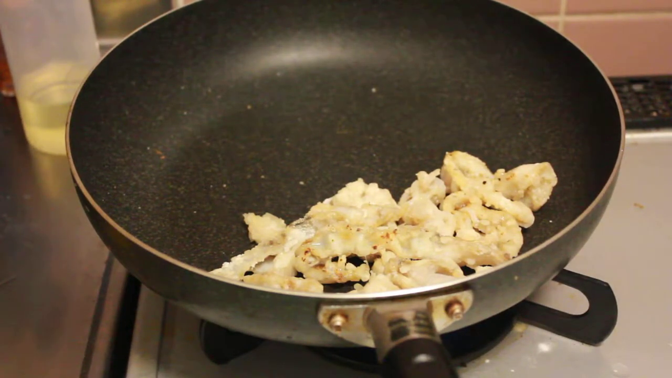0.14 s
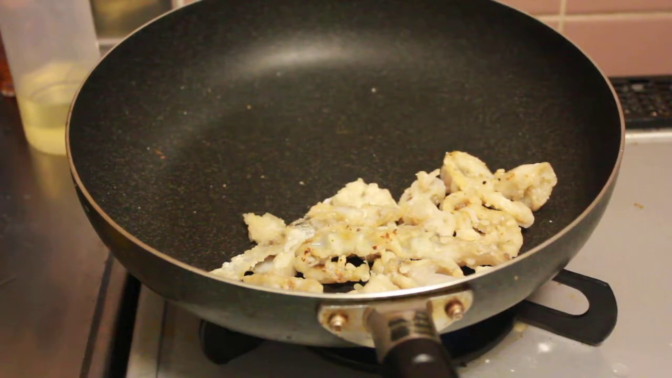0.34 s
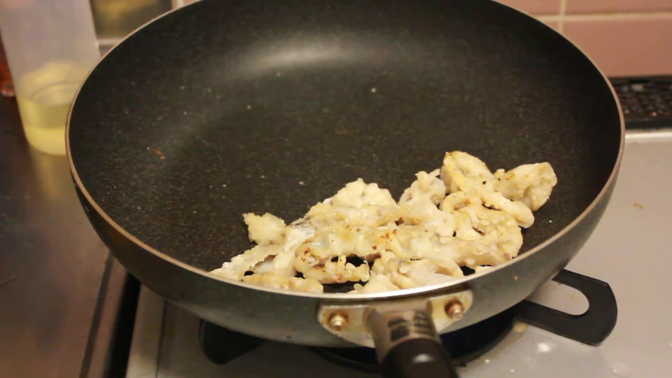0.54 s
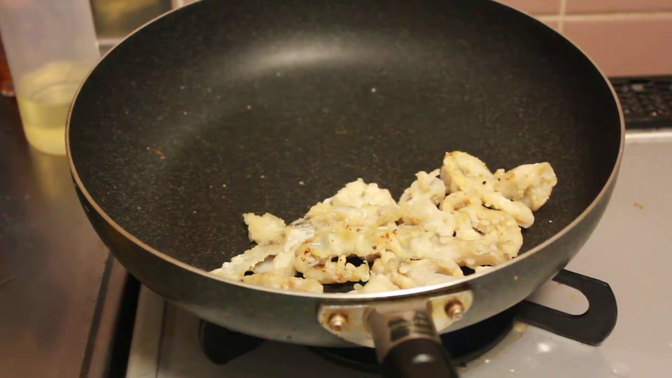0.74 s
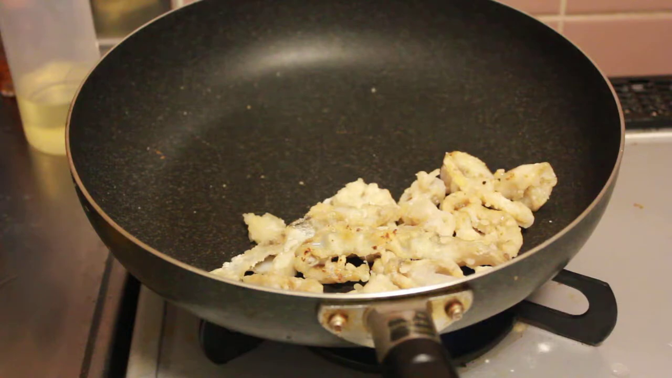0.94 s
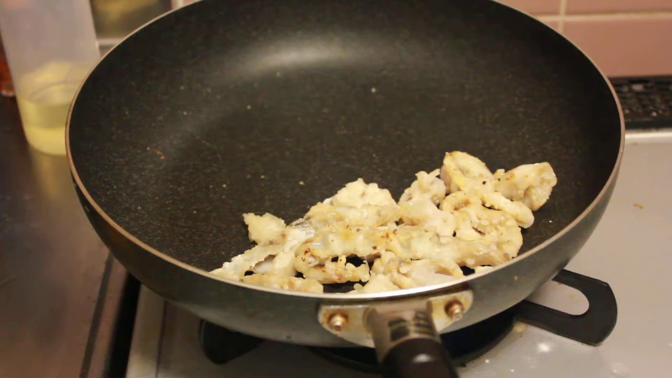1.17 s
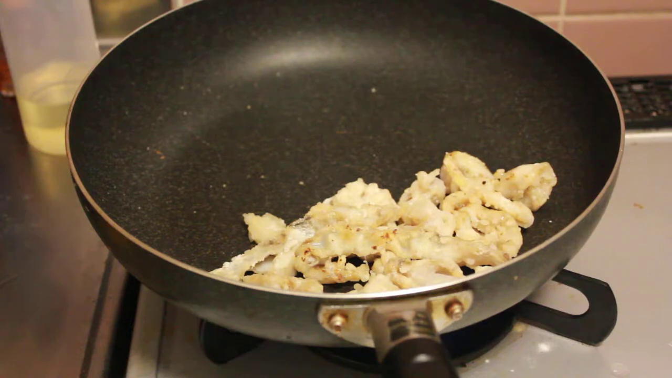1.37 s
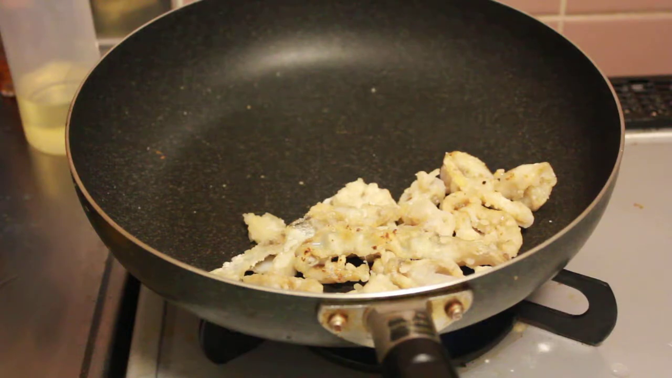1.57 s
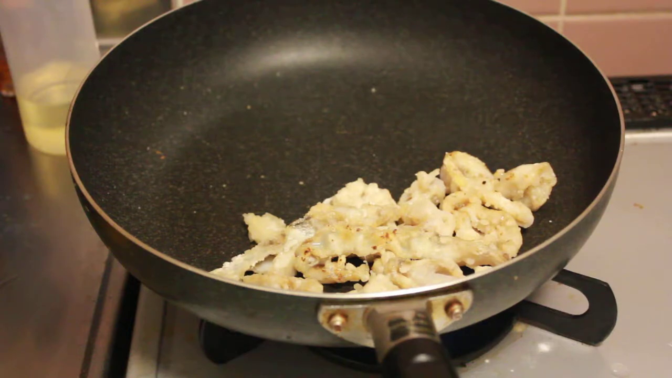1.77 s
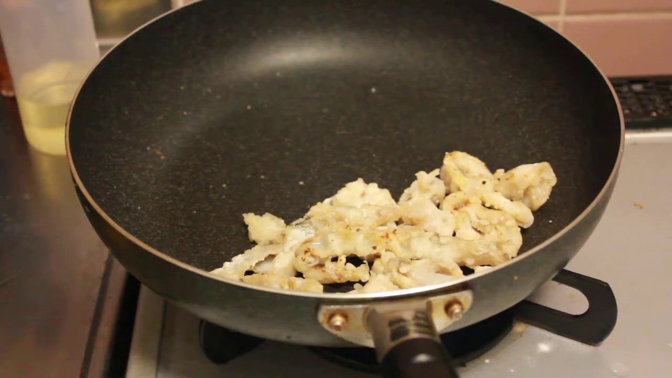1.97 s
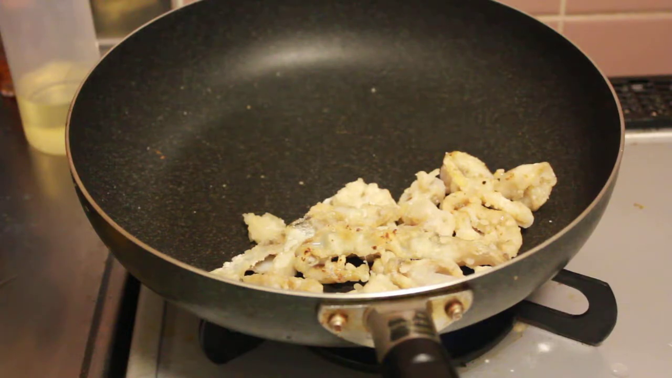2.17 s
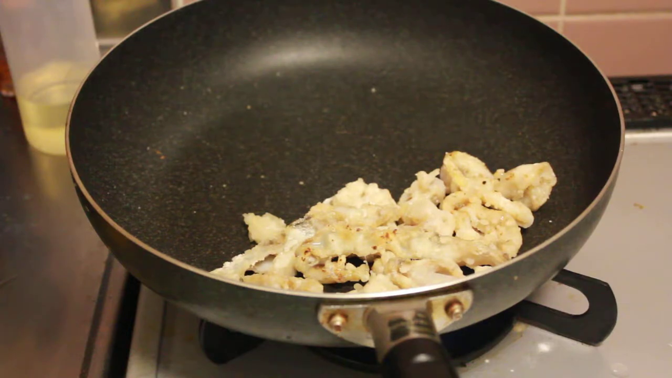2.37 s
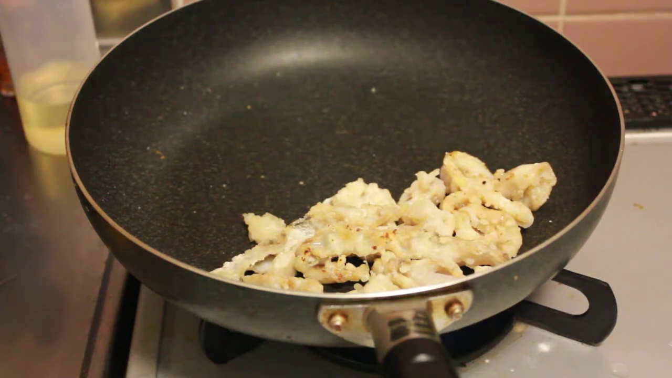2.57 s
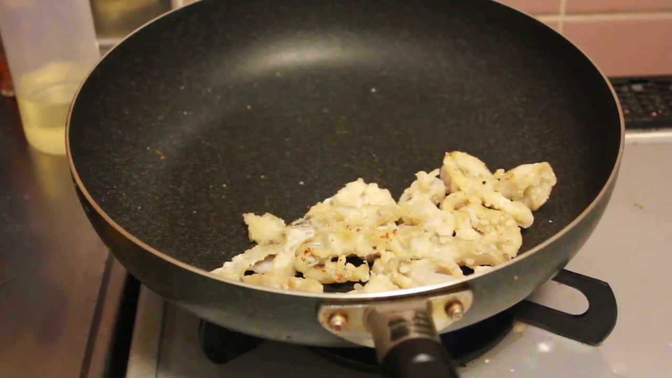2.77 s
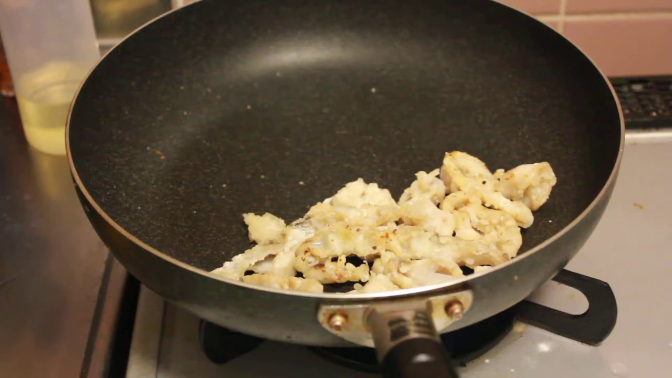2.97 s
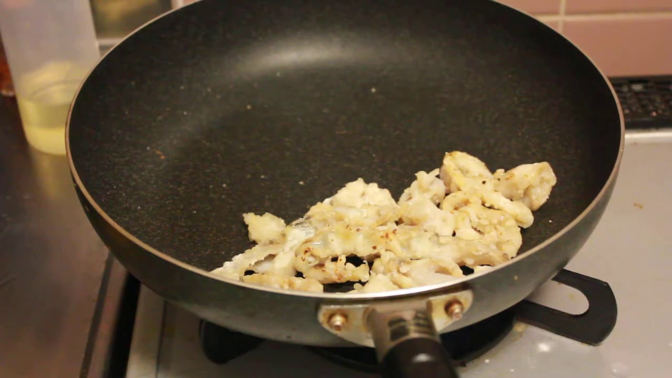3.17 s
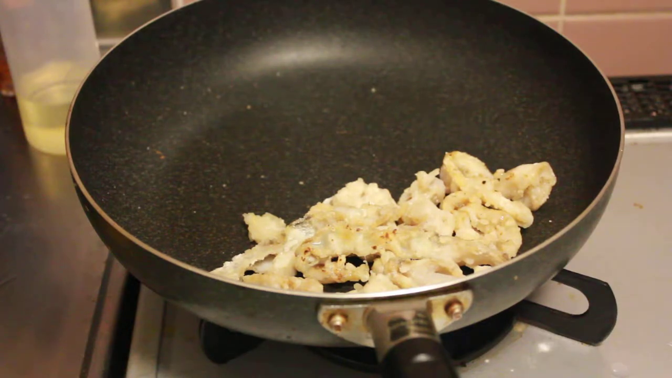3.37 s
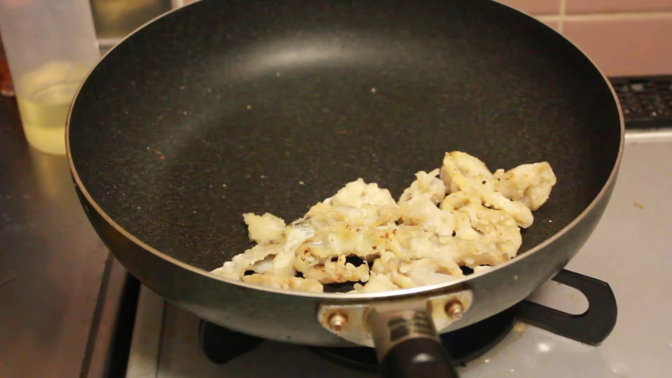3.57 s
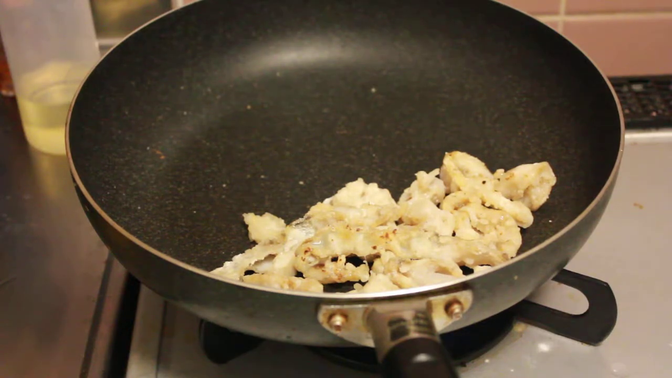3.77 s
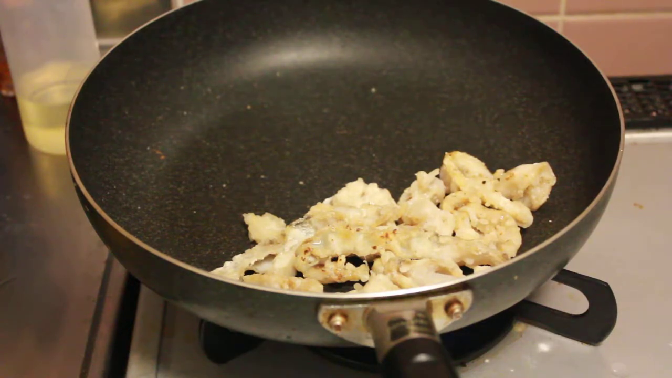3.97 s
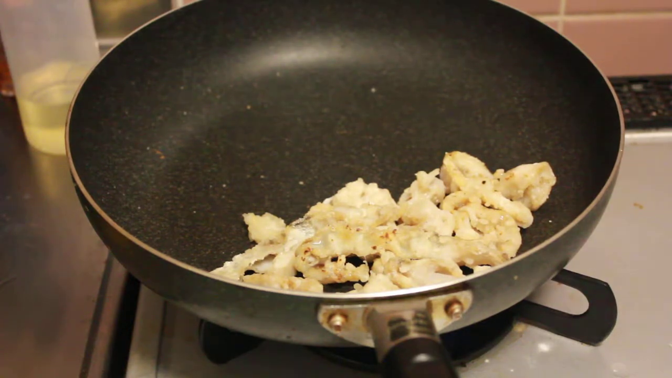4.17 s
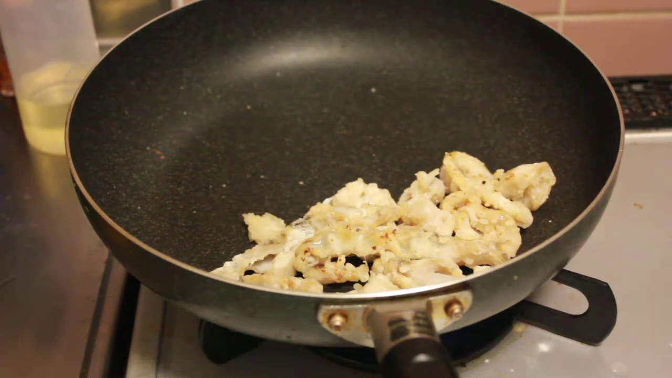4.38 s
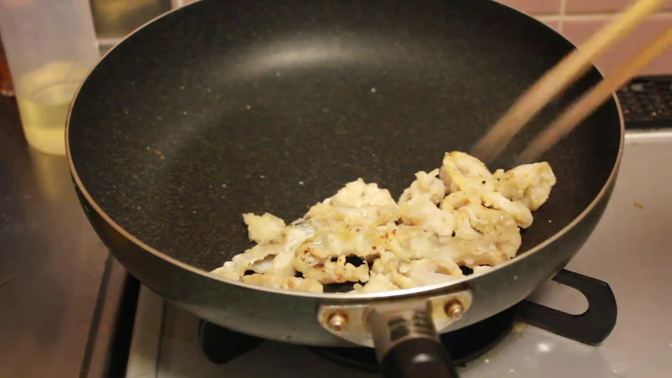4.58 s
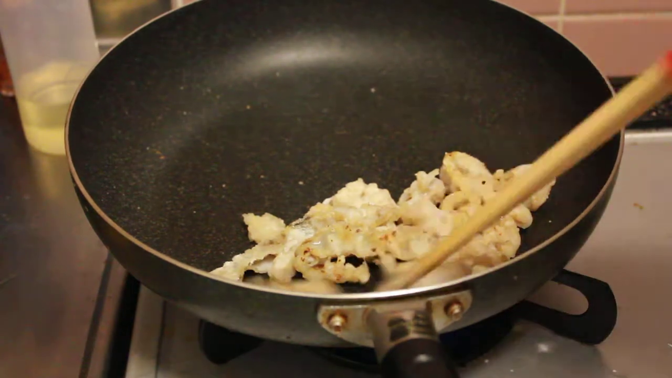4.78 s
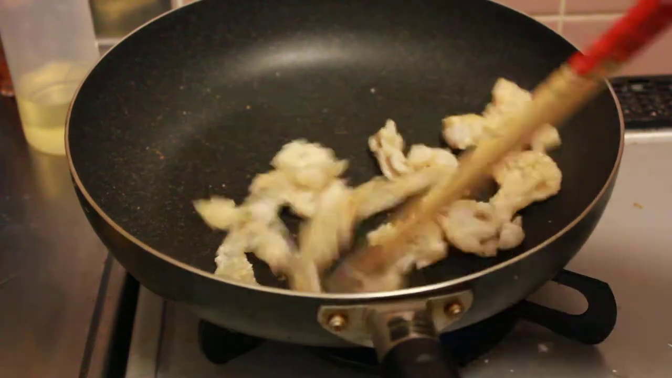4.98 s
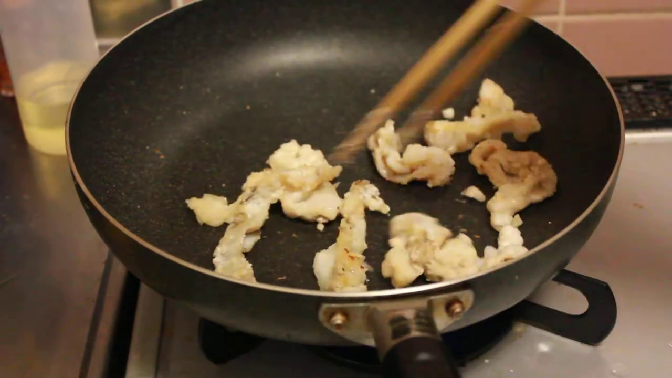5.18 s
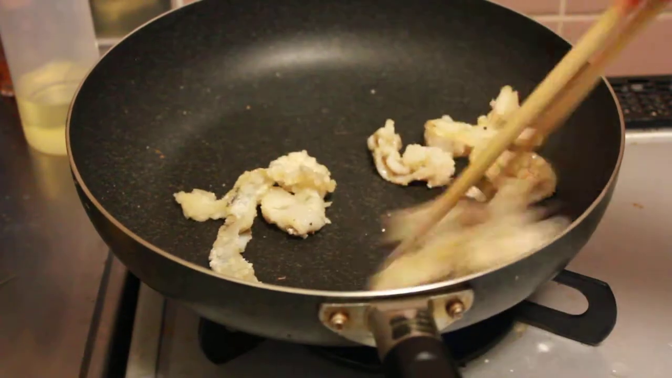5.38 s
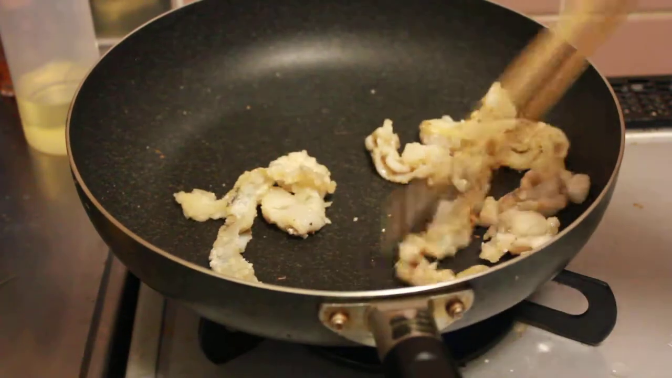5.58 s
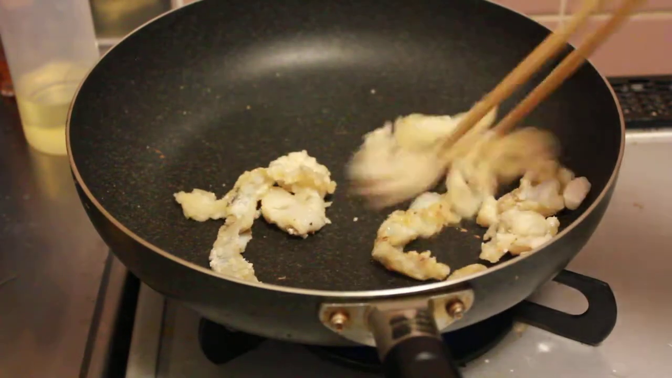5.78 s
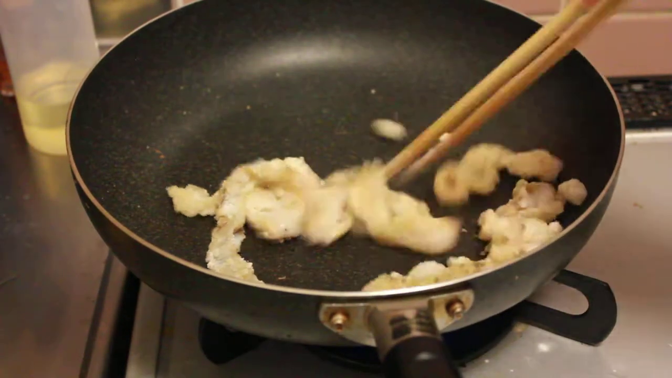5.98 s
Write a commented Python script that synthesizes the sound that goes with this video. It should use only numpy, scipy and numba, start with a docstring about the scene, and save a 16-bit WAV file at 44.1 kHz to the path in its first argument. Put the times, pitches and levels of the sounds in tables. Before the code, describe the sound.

Pieces of meat fry in a nonstick pan on a gas hob, heard close from above in a small kitchen. A soft sizzle strengthens after one second into dense fizz, steam sputters and snapping droplets. Faint bumps come from beside the stove. In the last stretch, chopsticks stir quickly, brightening the fizz and knocking lightly on the pan, over a soft burner and fan rush.

```python
"""Meat frying in a nonstick pan

Pieces of meat fry on a gas hob, heard in mono from close above in a small kitchen.
Open oil fizzes brightly and trapped steam sputters lower: both are random clicks, coloured by the pan's bowl.
Juice spurts raise the click power, and bursting droplets snap as single cracks with a puff of noise.
Near the end chopsticks stir, raising the fizz and knocking on the pan, which rings as damped modes.
Soft bumps, filtered noise for burner and fan, and a wavering mains hum lie behind."""
import sys
import numpy as np
from scipy import signal
from scipy.fft import rfft, irfft
from scipy.io import wavfile
from numba import njit

SR = 44100
rng = np.random.default_rng(int(sys.argv[2]) if len(sys.argv) > 2 else 0)


def unload_wav(signal):
    """Save mono or channel-first audio to the path in sys.argv[1] as 16-bit WAV at rate SR, clipped to [-1, 1]."""
    wavfile.write(
        sys.argv[1],
        SR,
        np.round(np.clip(np.atleast_2d(signal).T, -1, 1) * 32767).astype(np.int16),
    )


N = 265923
T = np.arange(N) / SR  # time of every sample [s]


# Large droplets that burst: (time [s], level before snap_db [dB], fizz over steam [dB])
DROPLET_SNAPS = [(1.142, 1, 17), (1.3243, 7, 10), (1.852, 3, 8), (2.472, 9.5, 11), (2.8949, 2, 18),
                 (3.035, 1.5, -11), (3.0617, -2, 0), (3.356, 14.5, 28), (5.354, 8, 35), (5.839, 5.5, 14)]
# Spectrum of a bubble bursting in the open: (frequency [Hz], relative level [dB])
FIZZ_COLOUR = [(100, -23.5), (400, -23.5), (1000, -14.5), (2000, -10), (3500, -4), (5500, -7), (7000, -1.5),
               (9000, -1), (12500, 0.5), (14000, 1.5), (15700, -4.5)]
# Spectrum of a bubble bursting under the meat: (frequency [Hz], relative level [dB])
STEAM_COLOUR = [(100, -16.5), (400, -12.5), (750, -9.5), (1000, -12.5), (2000, -9), (3200, -4.5),
                (4400, -0.5), (5500, -0.5), (6700, -1), (8200, -11.5), (11000, -10), (16000, -9.5)]
# Air resonances in the bowl of the pan: (frequency [Hz], width [Hz], relative peak gain [dB])
BOWL_MODES = [(739, 40, 1), (1221, 30, 0), (1491, 35, 4), (1730, 60, 0), (2280, 55, -2), (2601, 32, 3),
              (2910, 28, 0), (3057, 30, 3), (3437, 45, 3), (3856, 60, -3), (4144, 27, 0), (4440, 45, 2),
              (4652, 50, -2), (4840, 35, 0), (5240, 35, -2), (5343, 22, 7.5), (5446, 38, 6), (5792, 27, -1),
              (6253, 45, -3), (6520, 30, 2), (6900, 32, -3.5)]


def frying(fizz_ring_db=-7, steam_ring_db=0, snap_db=2, mist_db=-19, mist_decay=0.0006, thinness=0.95):
    """Source and resonator: open fizz, trapped steam and droplet snaps excite the air in the bowl."""
    fizz_surge, steam_surge = surges()
    fizz = bubbling(column=1, surge=fizz_surge, rate=8000, spread_db=5.0,
                    spray_rate=250, spray_decay=0.0012)
    steam = bubbling(column=2, surge=steam_surge, rate=5000, spread_db=5.5,
                     spray_rate=95, spray_decay=0.0057)
    mist = amp(mist_db) * rng.standard_normal(N)
    for at, db, bright_db in DROPLET_SNAPS + stray_snaps():
        # one sharp crack, then a puff of fine mist
        crack = signal.unit_impulse(N, int(at * SR))
        snap = crack + mist * fade(at, mist_decay)
        in_open, under_meat = split(db + snap_db, bright_db)
        # a crack in the open has little bass
        thin_snap = snap - thinness * np.roll(snap, 1)
        fizz += thin_snap * in_open
        # the burst under the meat keeps its bass and is doubled in size
        steam += snap * under_meat * 2
    fizz = through(pan_walls(fizz, echo_db=-3.5, decay=0.0023), colour(FIZZ_COLOUR))
    steam = through(pan_walls(steam, echo_db=-1.5, decay=0.0014), colour(STEAM_COLOUR))
    bowl = ring(BOWL_MODES)
    direct = signal.unit_impulse(len(bowl))
    fizz_in_bowl = through(fizz, unit(direct + amp(fizz_ring_db) * bowl))
    steam_in_bowl = through(steam, unit(direct + amp(steam_ring_db) * bowl))
    return fizz_in_bowl + steam_in_bowl


# How hard it fries; it picks up as the juice starts to run, and stirring turns steam to fizz:
# (time [s], open fizz level [dB], trapped steam level [dB]), before surges and lulls
SIZZLE_LEVELS = [(0, -26.5, -31), (.65, -28.5, -32), (.74, -24, -32), (.96, -29, -29), (1.05, -21, -23),
                 (1.5, -18, -19.5), (1.78, -22.5, -22), (2.75, -19, -21), (3.5, -20, -22.5),
                 (3.68, -17.5, -19.5), (3.8, -21, -21), (4.76, -20.5, -22.5), (4.82, -15, -23.5),
                 (6.03, -15, -24.5)]


def bubbling(column, surge, rate, spread_db, spray_rate, spray_decay):
    """Shot noise: many random bursts of one kind, in sprays that lessen as the meat settles."""
    curve = np.array(SIZZLE_LEVELS)
    # share of the power that comes in sudden sprays, before and after 2.4 to 3.4 s
    spray_share = np.interp(T, (2.4, 3.4), (0.27, 0.1))
    steady_power = amp(np.interp(T, curve[:, 0], curve[:, column])) ** 2
    grouping = 1 - spray_share + spray_share * sprays(spray_rate, spray_decay)
    power = steady_power * grouping + surge
    return pops(rate, spread_db) * np.sqrt(power) * lulls()


def sprays(rate, decay, size=4000):
    """Clustered random process: power starts at once in each spray and dies away; mean 1."""
    starts = (rng.random(N) < rate / SR) * rng.exponential(1, N)
    power = np.maximum(through(starts, np.exp(-T[:size] / decay)), 0)
    return power / np.mean(power)


# Juice runs into the oil and flares up: (time [s], length [s], level [dB], fizz over steam [dB])
JUICE_SPURTS = [(0.943, 0.013, -20, 6), (1.08, 0.012, -21, -16), (1.415, 0.034, -16.5, -15),
                (1.718, 0.016, -20, 4), (1.81, 0.081, -20.5, 0), (2.05, 0.034, -19.5, -9),
                (2.193, 0.029, -21, -1), (2.33, 0.027, -19, -6), (2.447, 0.017, -24.5, -8),
                (2.595, 0.034, -16.5, -5), (2.752, 0.059, -17, 4), (2.873, 0.013, -11.5, 6),
                (2.96, 0.024, -18.5, 6), (3.039, 0.022, -14, -1)]
# Chopsticks push meat onto fresh hot oil: (time [s], length [s], level [dB])
STIRRING_STROKES = [(4.79, 0.1, -15.5), (4.86, 0.059, -15.5), (5.027, 0.04, -16.5), (5.26, 0.09, -21.5),
                    (5.443, 0.086, -14.5), (5.614, 0.059, -18), (5.745, .11, -14.5)]


def surges(first_bright_db=3, drying_db_per_s=11):
    """Addition of powers: spurts of juice and stirring strokes add to (fizz, steam)."""
    power = np.zeros((2, N))
    for at, length, db, bright_db in JUICE_SPURTS:
        power += np.outer(split(db, bright_db) ** 2, flare(at, length))
    for at, length, db in STIRRING_STROKES:
        # later strokes find less steam left under the meat
        bright_db = first_bright_db + drying_db_per_s * (at - STIRRING_STROKES[0][0])
        power += np.outer(split(db, bright_db) ** 2, flare(at, length, release=0.0089))
    return power


def stray_snaps(count=16, over_fizz_db=12.5, range_db=7, max_bright_db=22):
    """Stratified chance: one small droplet per equal time slot, its level following the fizz level."""
    when, size, tone = rng.random((count, 3)).T
    at = (np.arange(count) + when) / count * T[-1]
    times, fizz_levels, _ = np.transpose(SIZZLE_LEVELS)
    level_db = np.interp(at, times, fizz_levels) + over_fizz_db - range_db * size
    return list(zip(at, level_db, max_bright_db * tone))  # rows as in DROPLET_SNAPS


# The sizzle falls away briefly: (time [s], length [s], depth [dB])
SIZZLE_LULLS = [(3.083, 0.068, 3), (5.872, 0.046, 3.5)]


def lulls():
    """Amplitude modulation: the gain of the bubbling drops quickly at each lull and recovers."""
    drop_db = sum(depth_db * flare(at, length, attack=0.014, release=0.018)
                  for at, length, depth_db in SIZZLE_LULLS)
    return amp(-drop_db)


def pan_walls(x, echo_db, decay, size=600):
    """Diffuse reflection: the sloping walls throw every click back within a few milliseconds."""
    t = T[:size]
    envelope = np.exp(-t / decay) * (1 - np.exp(-t / decay))
    smear = unit(rng.standard_normal(size) * envelope)
    # each bubble sits elsewhere, so the echoes keep their envelope but share no pattern
    echo_power = np.maximum(through(x ** 2, smear ** 2), 0)
    echoes = np.sqrt(echo_power) * rng.standard_normal(N)
    return (x + amp(echo_db) * echoes) / np.hypot(1, amp(echo_db))


# Chopsticks meet the pan: (time [s], wall ring gain [dB], gain of thud through the hob [dB],
# decay time of the drag [s])
CHOPSTICK_KNOCKS = [(4.892, -26, -31.5, 0.054), (4.995, -23, -25.5, 0.016), (5.261, -10, -36, 0.016),
                    (5.306, -12.5, -27, 0.014), (5.329, -34, -22, 0.03), (5.385, -37, -33, 0.11),
                    (5.487, -25, -47, 0.014), (5.792, -25, -57, 0.03)]
# Chopstick tips rub over the pan floor: (time [s], length [s], level before wavering [dB])
FLOOR_RUBS = [(5.787, 0.055, -25.5), (5.86, 0.135, -35), (6.006, .03, -26)]
# The tips squeak as the rubbing begins: (time [s], length [s], frequency [Hz])
TIP_SQUEAK = (5.772, .035, 3275)
# Modes of the pan: (frequency [Hz], width [Hz], relative peak gain [dB])
PAN_MODES = [(742, 29, 16.5), (760, 65, -9), (907, 56, 2), (1080, 69, 4.5), (1100, 410, -22),
             (1235, 17, 11.5), (1400, 49, -7), (1560, 40, -3), (1940, 44, -6), (2310, 37, -7),
             (3330, 89, -5)]
# Modes of the pan support and hob top: (frequency [Hz], width [Hz], relative peak gain [dB])
HOB_MODES = [(183, 4.7, 6), (218, 13, 1), (276, 25, 0.5), (378, 21, 6), (490, 67, -10)]


def chopsticks(strike_db=17, drag_db=0, squeak_db=-24):
    """Modal excitation: a blow and short drag ring the pan and its support; rubbing makes it sing."""
    wall, support = np.zeros(N), np.zeros(N)
    grit = pops(3000, 1.4)
    for at, wall_db, thud_db, drag_decay in CHOPSTICK_KNOCKS:
        blow = amp(strike_db) * signal.unit_impulse(N, int(at * SR))
        drag = amp(drag_db) * grit * fade(at, drag_decay)
        wall += amp(wall_db) * (blow + drag)
        support += amp(thud_db) * (blow + drag)
    # slow rubbing feeds only a low pan mode near 750 Hz, which sings unsteadily
    pressure = np.sqrt(sum(amp(db) ** 2 * flare(at, length) for at, length, db in FLOOR_RUBS))
    tone = np.sqrt(2) * np.sin(2 * np.pi * 750 * T + walk(90))
    singing = tone * amp(2.5 * walk(90))
    at, length, hz = TIP_SQUEAK
    squeak_tone = np.sin(2 * np.pi * hz * T + walk(150))
    squeak = amp(squeak_db) * np.sqrt(flare(at, length)) * squeak_tone
    knocks = through(wall, unit(ring(PAN_MODES))) + through(support, unit(ring(HOB_MODES)))
    return knocks + pressure * singing + squeak


# Soft bumps beside the stove: (time [s], level before rattle_db and thump_db [dB],
# body frequency [Hz], decay time of the rattle [s])
WORKTOP_BUMPS = [(.644, -29.5, 150, 0.03), (.655, -37.5, 410, 0.16), (2.617, -30, 273, 0.039),
                 (2.631, -36.5, 135, .08), (3.042, -28.5, 522, 0.027), (3.706, -35, 98, 0.04),
                 (3.967, -25, 676, 0.032), (3.977, -32, 145, 0.048), (4.737, -28, 235, 0.041)]


def bumps(top_ratio=1.54, rattle_db=-3.0, thump_db=-2, thump_decay=.022):
    """Soft impact: a decaying sine at the body pitch and a rattle of noise with little treble."""
    out = np.zeros(N)
    for at, db, body_hz, decay in WORKTOP_BUMPS:
        top_hz = top_ratio * body_hz
        body = colour([(body_hz / 10, -45), (body_hz / 2, -17), (body_hz, 0),
                       (top_hz, -3), (2 * top_hz, -22), (10 * top_hz, -70)])
        rattle = through(rng.standard_normal(N) * fade(at, decay), body)
        thump = np.sin(2 * np.pi * body_hz * (T - at)) * fade(at, thump_decay)
        out += amp(db) * (amp(rattle_db) * rattle + amp(thump_db) * thump)
    return out


# Spectrum of the burner and extractor fan: (frequency [Hz], relative level [dB])
BURNER_COLOUR = [(20, -27), (38, -16), (75, -24), (105, 0.5), (160, -4.5), (250, 1.5), (330, -3), (550, 0),
                 (1200, -4.5), (2000, -8), (8000, -49)]
# Mains hum: (frequency [Hz], level before wavering [dB])
MAINS_HUM = [(100, -57), (200, -56)]


def stove(burner_db=-42, waver_db=1):
    """Broadband and tonal noise: the soft rush of flame and fan, with a wavering hum."""
    rush = through(rng.standard_normal(N), colour(BURNER_COLOUR))
    rush *= amp(burner_db + waver_db * walk(8.8))
    hum = np.zeros(N)
    for hz, db in MAINS_HUM:
        level = amp(db + 4.8 * walk(28))
        hum += level * np.sqrt(2) * np.sin(2 * np.pi * hz * T + 0.64 * walk(18))
    return rush + hum


def kitchen(x, size=16000, t60=0.3, wet_db=-15):
    """Diffuse reverberation: tiles and cupboards add a faint tail that falls 60 dB in t60 seconds."""
    t = T[:size]
    decay = amp(-60 * t / t60) * (t > .005)  # the tail starts after 5 ms
    tail = unit(rng.standard_normal(size) * decay)
    return x + amp(wet_db) * through(x, tail)


def amp(db):
    """Logarithmic level: decibels to amplitude gain."""
    return 10 ** (np.asarray(db) / 20)


def unit(response):
    """Energy normalisation: scale a response so that it passes white noise at unchanged power."""
    return response / np.sqrt(np.sum(response ** 2))


def through(x, response):
    """Linear filtering: convolve a sound with an impulse response."""
    return signal.fftconvolve(x, response)[:len(x)]


def colour(points, size=4096):
    """Minimum phase: the most compact causal click with the given (Hz, dB) spectrum shape."""
    hz, db = np.transpose(points)
    grid = np.maximum(np.arange(size // 2 + 1) * SR / size, 1)
    spectrum = amp(np.interp(np.log(grid), np.log(hz), db))
    # fold the cepstrum onto positive times to make the click causal
    cepstrum = irfft(np.log(spectrum))
    cepstrum[1:size // 2] *= 2
    cepstrum[size // 2 + 1:] = 0
    return unit(irfft(np.exp(rfft(cepstrum))))


def ring(modes, size=12000):
    """Modal superposition: a sum of damped cosines; dB is the gain at each peak."""
    t = T[:size]
    response = np.zeros(size)
    for hz, width, db in modes:
        start = amp(db) * 2 * np.pi * width / SR
        response += start * np.exp(-np.pi * width * t) * np.cos(2 * np.pi * hz * t)
    return response


def walk(rate):
    """Slow random modulation: `rate` random levels a second joined by lines, spread near 1."""
    values = rng.standard_normal(N)
    return 1.2 * np.interp(T * rate, np.arange(N), values)


def pops(rate, spread_db):
    """Poisson-like impulses: `rate` random clicks a second, many small and a few large, at rms 1."""
    born = rng.random(N) < rate / SR
    sizes = amp(spread_db * np.minimum(rng.standard_normal(N), 2.6))
    clicks = born * sizes * rng.choice([-1, 1], N)
    return clicks / np.std(clicks)


def fade(at, decay):
    """Exponential damping: a sudden start, then decay."""
    return (T >= at) * np.exp(-np.clip((T - at) / decay, 0, 50))


def flare(at, length, attack=0.01, release=0.0065):
    """Transient envelope: rises quickly, starts to die away after `length` (times in s)."""
    since = np.maximum(T - at, 0)
    rise = np.minimum(since / attack, 1)
    return rise * np.exp(-np.clip((since - length) / release, 0, 50))


def split(db, bright_db):
    """Power sharing: gains of open fizz and trapped steam for one total level."""
    return amp(db) * np.array([amp(bright_db), 1]) / np.hypot(1, amp(bright_db))


@njit
def follow(x, start, attack, release):
    """Envelope detection: peak level, quick to rise and slow to fall (times in s)."""
    out, level = np.empty(len(x)), start
    for i in range(len(x)):
        gap = abs(x[i]) - level
        level += gap / (SR * (attack if gap > 0 else release))
        out[i] = level
    return out


def scene():
    """Superposition: pan, chopsticks and bumps in the kitchen plus the stove, alike on both channels."""
    mono = kitchen(frying() + chopsticks() + bumps()) + stove()
    return np.array([mono, mono])


def record(dry, threshold=0.21, release=0.67, squeeze=0.45):
    """Compression: loud crackles duck what follows; peaks are rounded, rumble and the top are cut."""
    level = follow(dry[0], threshold, 0.00077, release)
    high_pass = signal.butter(3, 34, "high", fs=SR, output="sos")
    no_rumble = signal.sosfilt(high_pass, dry)
    ducked = no_rumble * np.minimum(1, threshold / level) ** squeeze
    rounded = ducked / (1 + (ducked / .9) ** 4) ** .25  # saturates towards 0.9
    low_pass = signal.firwin(601, 15800, fs=SR)
    return signal.fftconvolve(rounded, low_pass[None], mode="same")


dry = scene()
out = record(dry)
unload_wav(out)
```